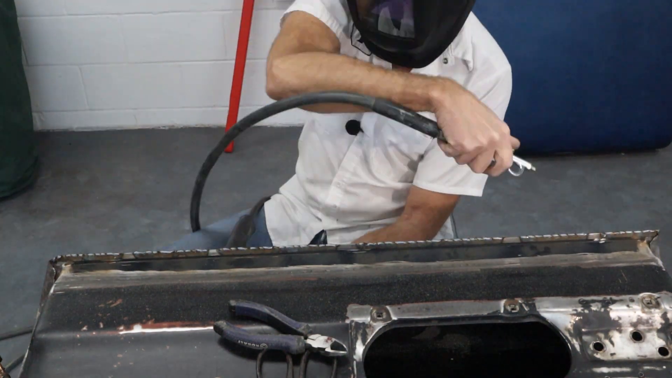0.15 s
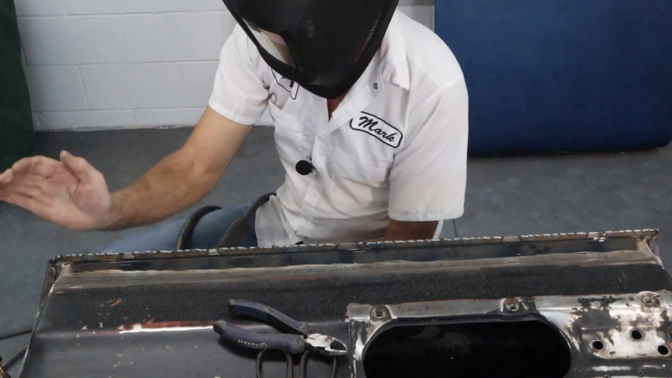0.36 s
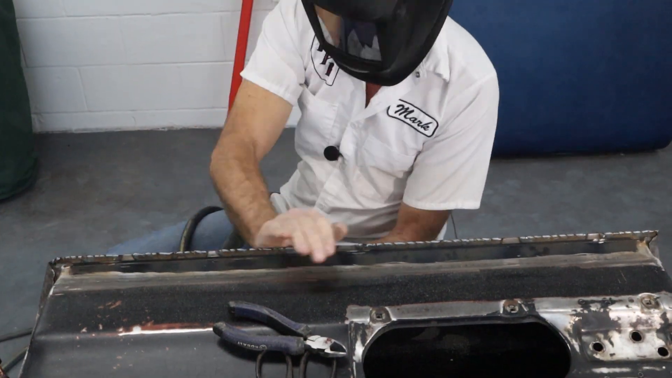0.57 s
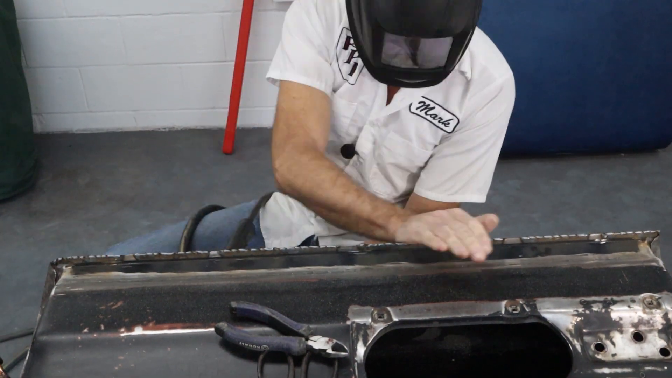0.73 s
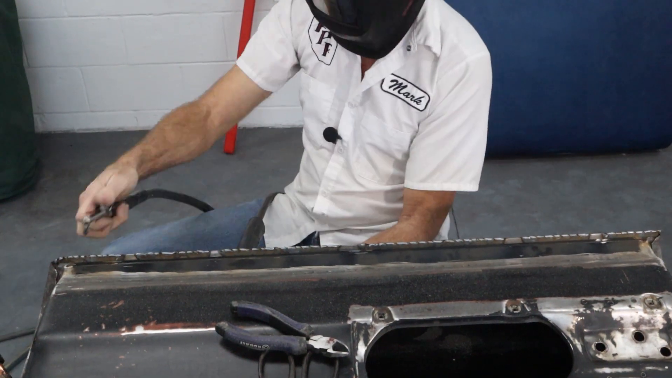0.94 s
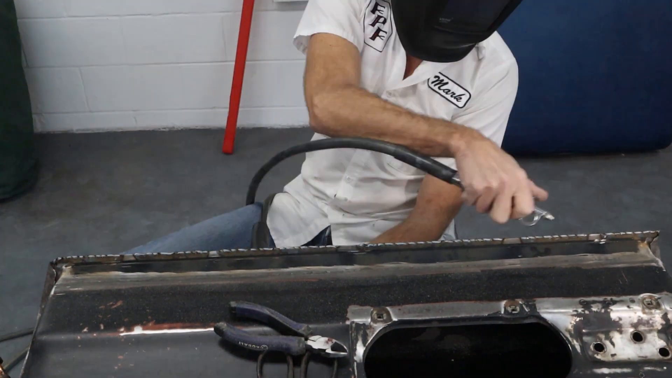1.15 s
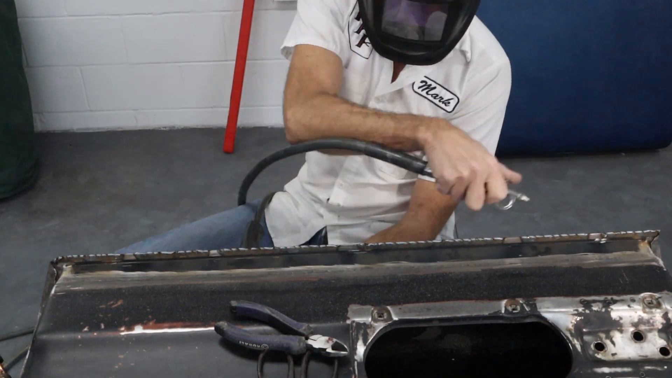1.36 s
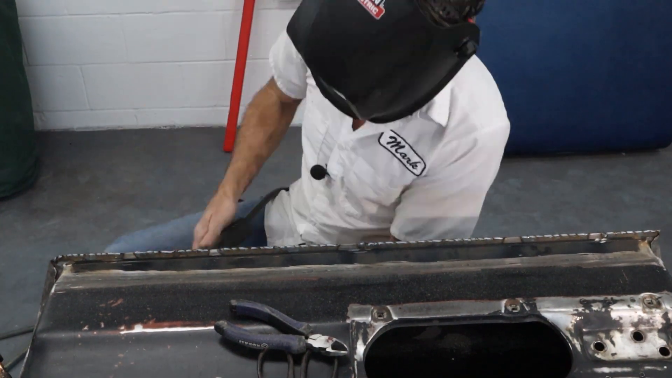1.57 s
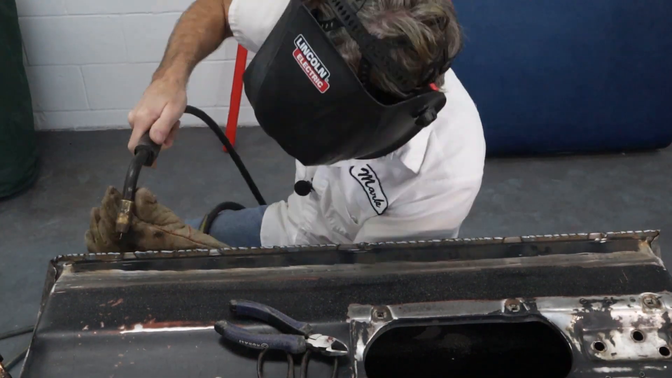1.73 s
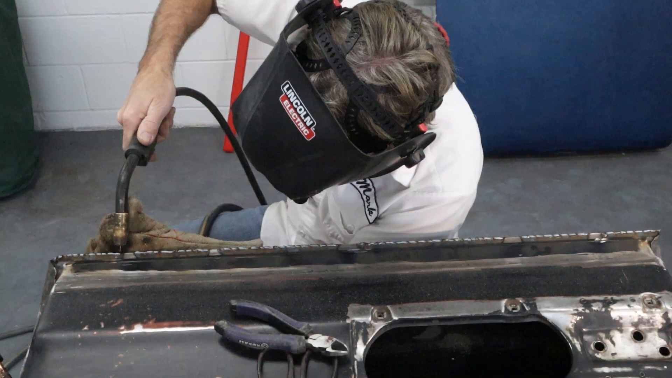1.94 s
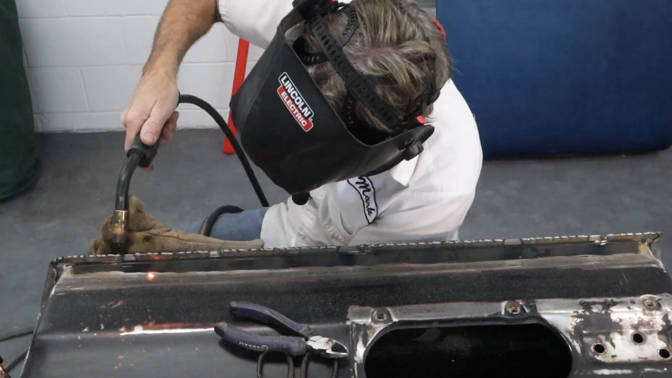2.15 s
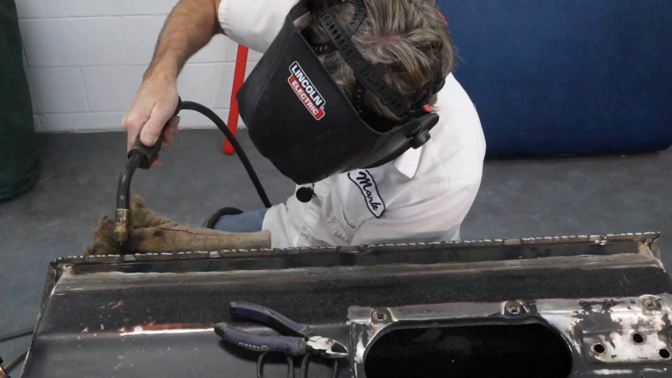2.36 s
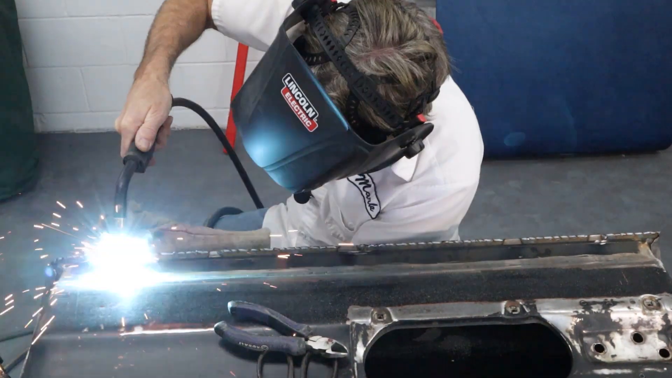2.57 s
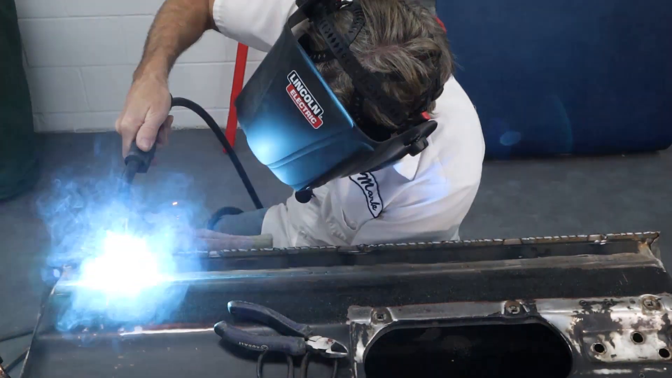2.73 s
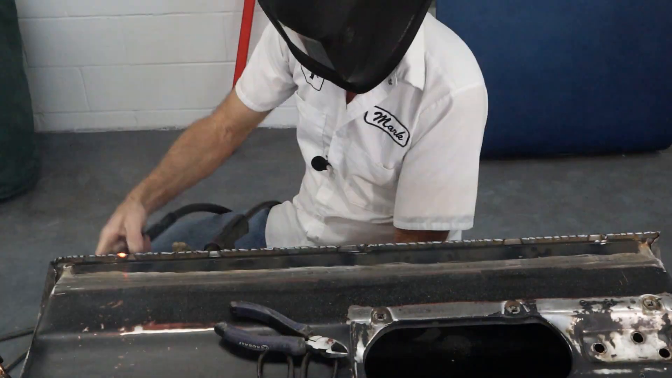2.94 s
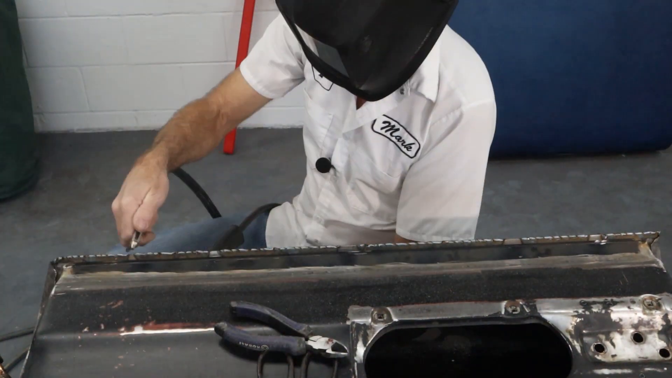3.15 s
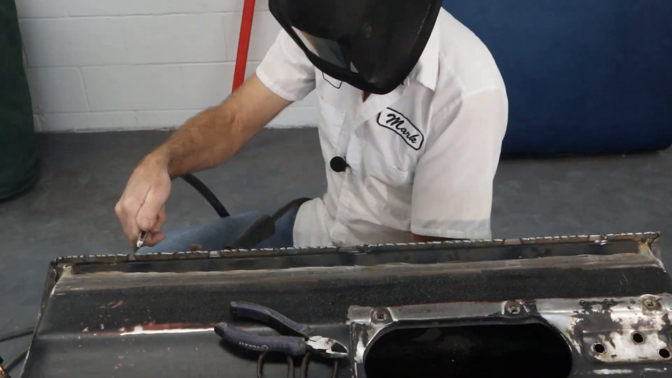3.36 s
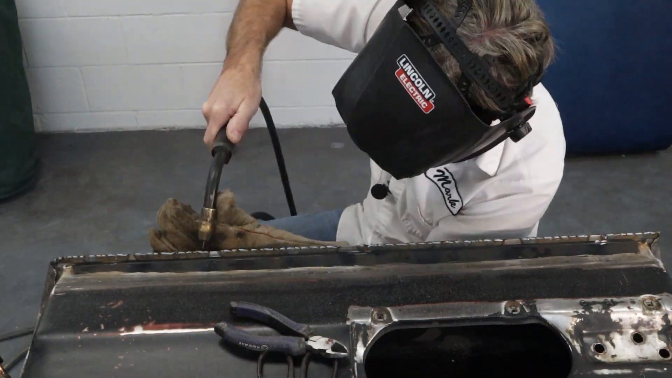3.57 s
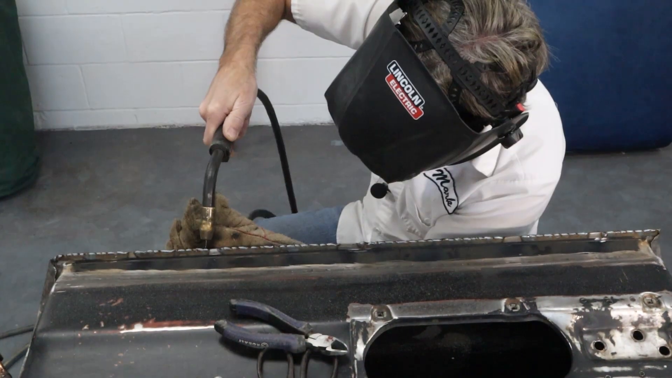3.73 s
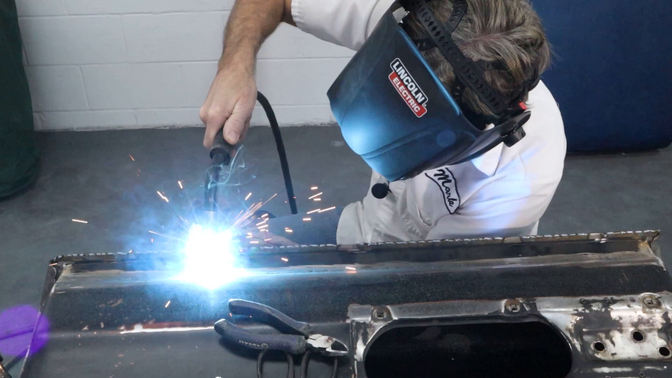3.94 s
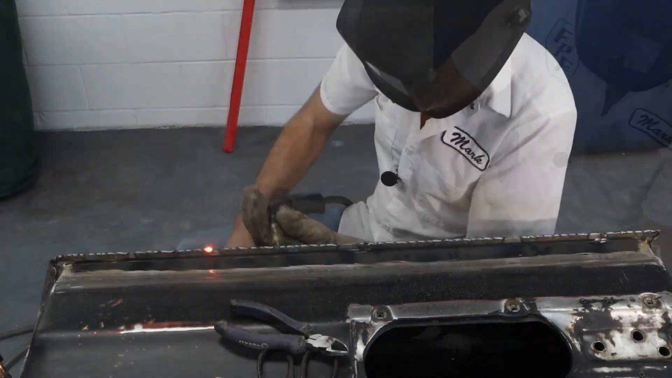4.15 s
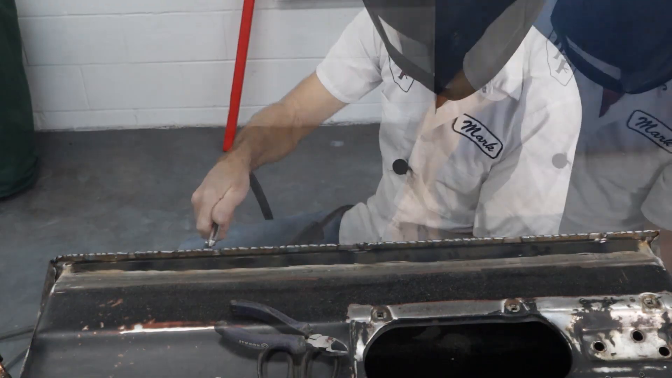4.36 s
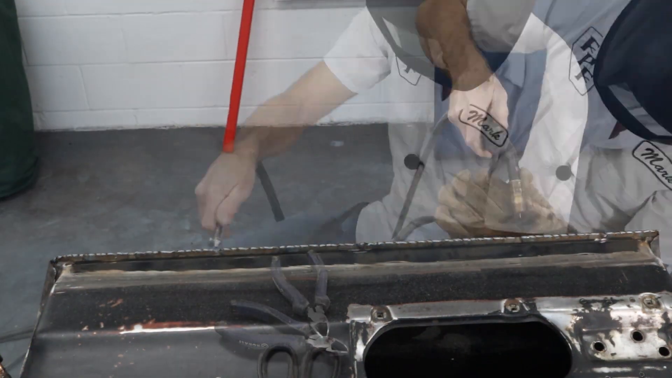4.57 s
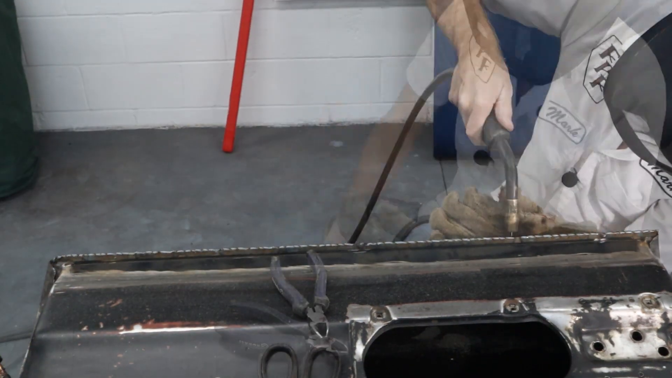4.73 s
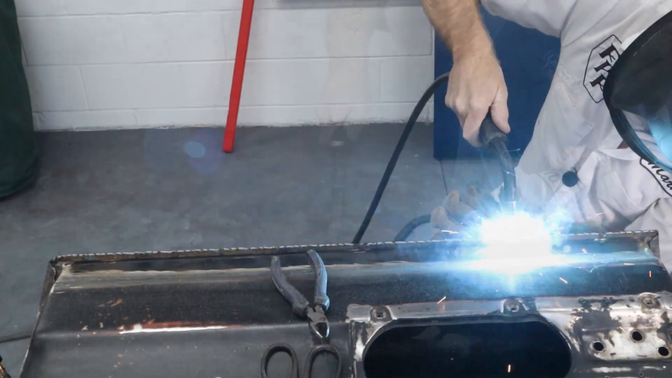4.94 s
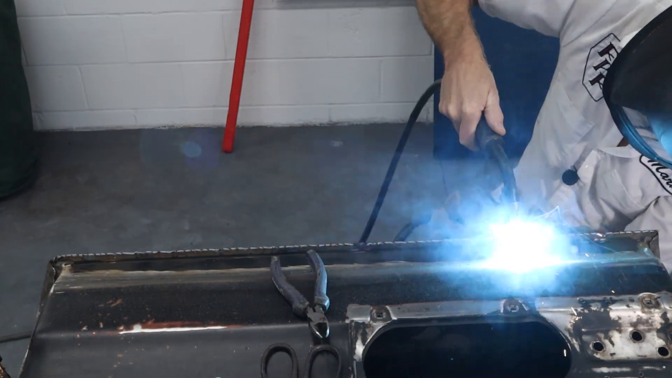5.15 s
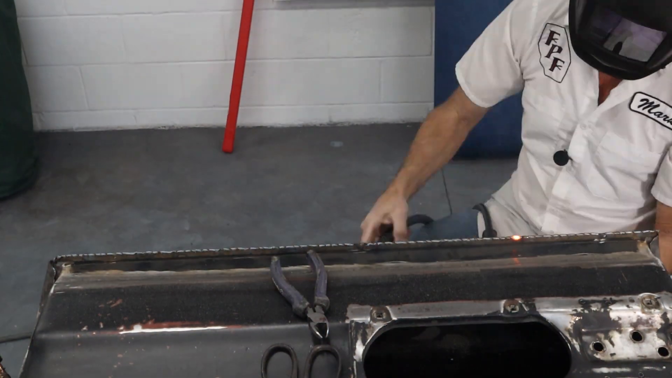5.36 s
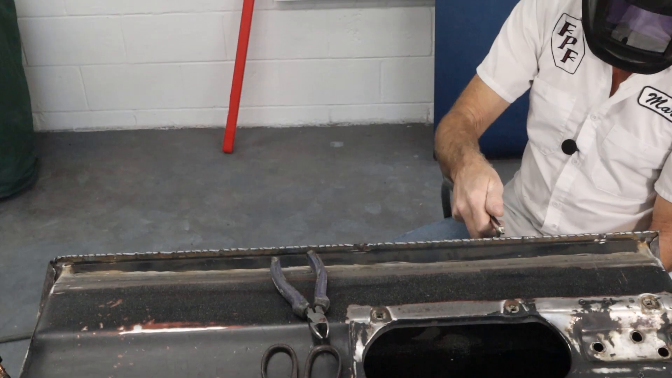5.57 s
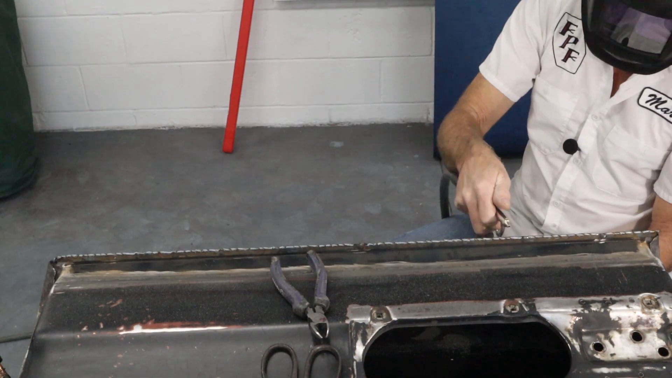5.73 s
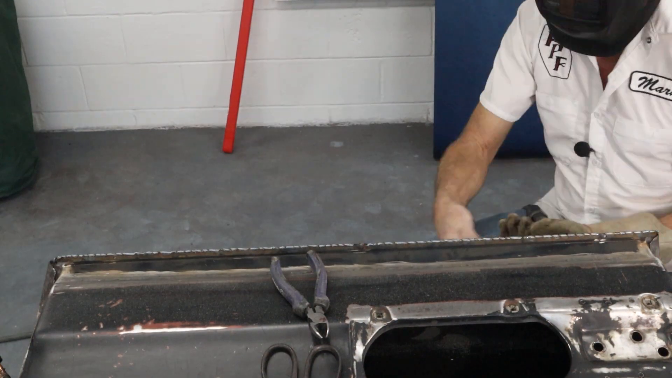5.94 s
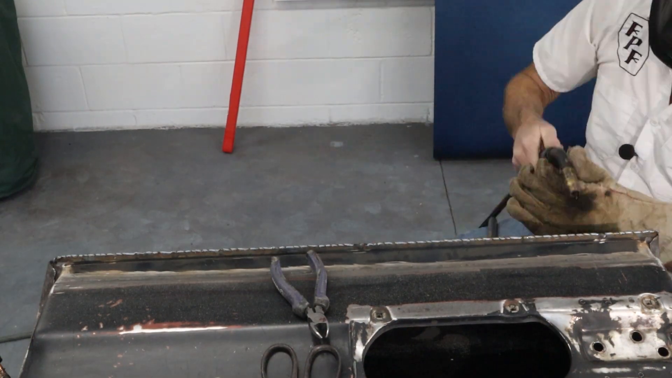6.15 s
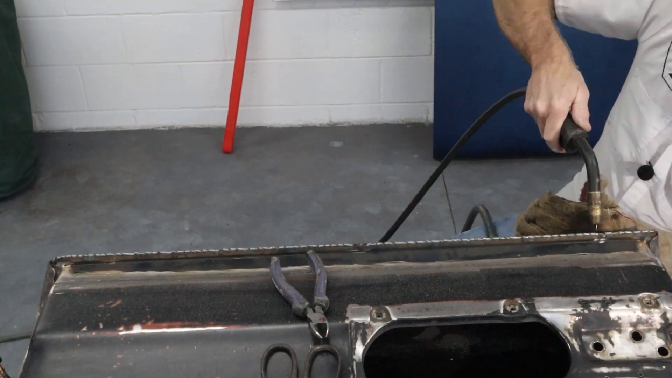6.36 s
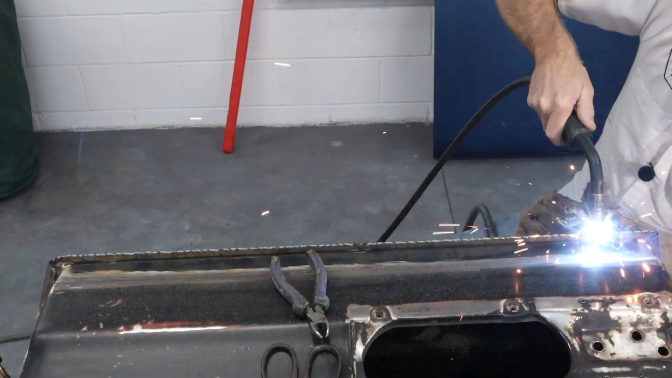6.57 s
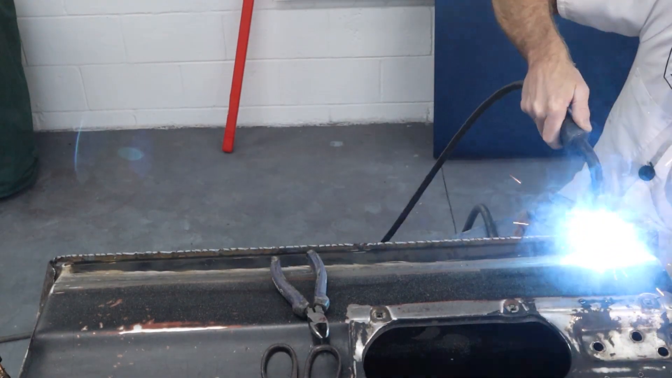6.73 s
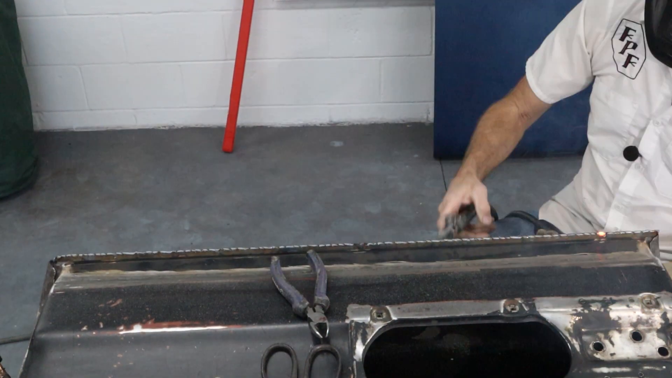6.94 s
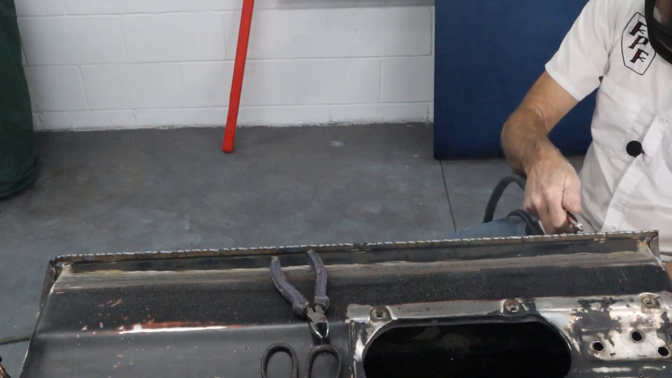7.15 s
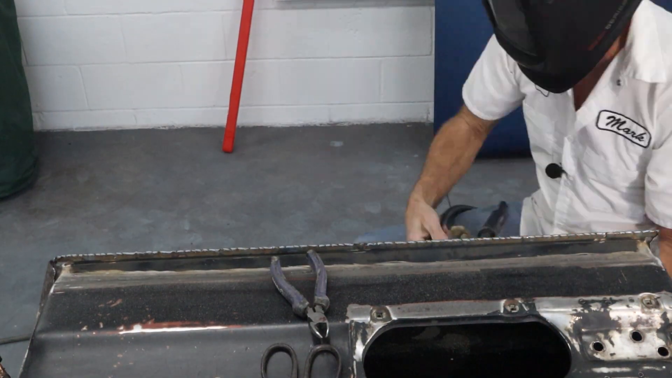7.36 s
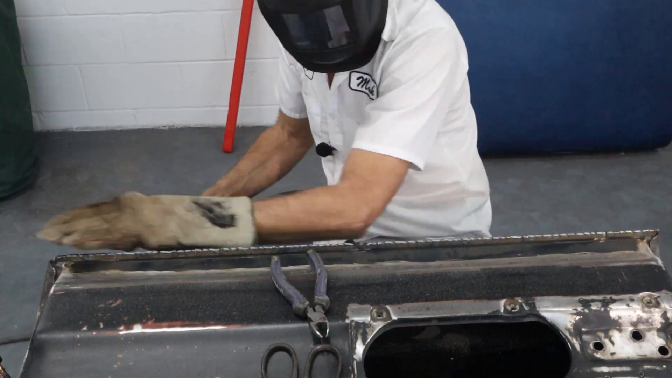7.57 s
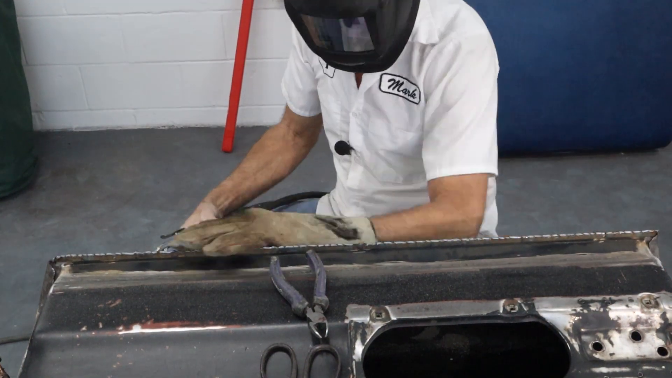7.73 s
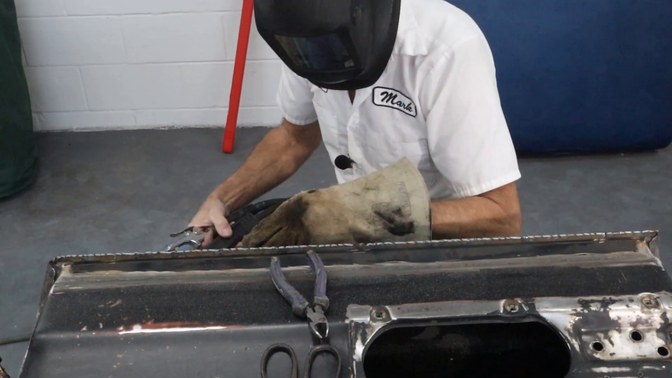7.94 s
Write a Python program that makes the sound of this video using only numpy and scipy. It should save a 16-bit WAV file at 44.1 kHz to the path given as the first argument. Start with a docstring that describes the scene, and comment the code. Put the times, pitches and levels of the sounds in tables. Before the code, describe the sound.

A welder tacks a steel panel in four brief spark bursts, cooling each with fluttering air blasts, over a thin steady electrical whine.

```python
"""A jet of air hisses first, with a thin machine whine and whir behind it; soon arc sparks crackle in short stitches.
A welder tacks a thin steel panel and cools each tack with a compressed-air nozzle, played at high speed.
Sparks are filtered clicks, air is shaped noise that swells over the seam, tools ring the sheet's resonances;
whine and whir are wavering sines and noise that sink under loud spells, heard by a small clip-on microphone."""
import sys
import numpy as np
from scipy import signal
from scipy.fft import rfft, irfft
from scipy.io import wavfile
from scipy.ndimage import uniform_filter1d

SR = 44100
rng = np.random.default_rng(int(sys.argv[2]) if len(sys.argv) > 2 else 0)


def pcm_store(signal):
    """Save signal as 16-bit PCM."""
    levels = np.round(np.clip(np.atleast_2d(signal), -1, 1) * 32767)
    wavfile.write(sys.argv[1], SR, levels.astype(np.int16).T)


def gain_from_db(level_db):
    """Turn a decibel level (scalar or array-like) into a linear amplitude factor."""
    decades = np.asarray(level_db, float) / 20
    return 10 ** decades


N = 352800

# level of the machine's whir: (time [s], level [dB])
MACHINE_LEVEL = [(0, -44.5), (2.6, -45), (2.9, -39.5), (3.05, -40), (3.5, -46.5), (4.4, -41.5),
                 (4.95, -47.5), (5.5, -46.5), (5.95, -47.5), (6.55, -44.5), (7.05, -47), (7.4, -50),
                 (7.55, -42), (8, -45)]
# main whine, shaded as the welder shifts along the bench: (time [s], level [dB])
WHINE_LEVEL = [(0, -50.5), (2.6, -48.5), (4.3, -48), (4.65, -52.5), (5.52, -59.5), (6.0, -57.5), (7.1, -62),
               (7.45, -56.5), (7.65, -48), (8, -49.5)]
# spectrum of the whir: (frequency [Hz], relative level [dB])
WHIR_COLOUR = [(20, -24), (45, -42), (80, -48), (140, -44), (220, -33), (480, -25.5), (1290, -21.5),
               (2140, -21.5), (3890, -14.5), (4760, -17), (6420, -15.5), (11700, -16), (15800, -18.5)]
# resonances of the machine's casing: (frequency [Hz], width [Hz], lift [dB])
CASING = [(1774, 450, 8.5), (3820, 560, 2.5), (3960, 39, 9.5), (6580, 310, 7), (9180, 920, 5),
          (12200, 410, 5)]
# fainter tones of the machine: (frequency [Hz], level over the whir [dB])
TONES = [(480, -36.5), (3700, -22), (3985, -20.5), (6019, -17.5), (6340, -23), (6655, -30), (6853, -26),
         (7275, -14.5), (7706, -26), (8238, -15), (9304, -30), (11789, -23)]
# each stitch: (arc takes hold [s], stops [s], settled spark level [dB], extra at the start [dB],
# settled shielding gas level [dB])
STITCHES = [(2.634, 2.896, -18, 8, -35.5), (3.926, 4.167, -16.5, 5.5, -37), (4.95, 5.308, -19, 10, -41),
            (6.637, 6.893, -18.5, 6, -41.5)]
# single sparks placed by time, most of them strong, with two stray snaps outside the stitches:
# (time [s], level [dB])
PLACED_SPARKS = [(2.1769, -7.5), (2.6239, 0.5), (2.633, 0), (2.6352, -7), (2.638, -2), (2.6416, -4),
                 (2.6452, -9), (2.659, -14), (2.6746, -6), (2.7027, -5), (2.8024, -9.5), (2.8158, -12),
                 (2.8712, -14), (2.8805, -11), (3.917, -9), (3.9182, -8.5), (3.9283, -2), (3.938, -5),
                 (3.9474, -16), (3.9583, -6), (3.9606, -8), (4.011, -3.5), (4.079, -7.5), (4.9298, -6.5),
                 (4.9427, -11), (4.947, -2.5), (4.9488, -16), (4.9538, -3.5), (4.9602, -12), (4.962, -2),
                 (4.9653, -10), (5.0102, -8), (5.07, -9.5), (6.284, -15.5), (6.6262, -14), (6.6407, -19),
                 (6.6533, -8), (6.6614, -7.5), (6.6735, -3.5), (6.7053, -5), (6.717, -5)]
# spectrum of a spark: (frequency [Hz], relative level [dB])
SPARK_COLOUR = [(120, -37), (200, -35), (610, -22.5), (1600, -14.5), (3050, -8.5), (8330, -2), (11800, -4),
                (12800, -8), (13800, -8), (15800, -14.5)]
# the air valve: (opens [s], shuts [s])
VALVE = [(0, .228), (1.0615, 1.497), (2.125, 2.19), (3.0515, 3.452), (4.3415, 4.588), (5.5445, 5.921),
         (6.028, 6.142), (7.0905, 7.376)]
# each blast of air: (hiss at first [dB], hiss at last [dB], roar minus hiss [dB])
BLASTS = [(-39, -39, -13), (-32.5, -46.5, -14), (-41, -54, -3.5), (-34.5, -40.5, -12), (-33.5, -40, -15.5),
          (-34, -43, -29), (-39, -54, -6), (-34, -42.5, -14.5)]
# the jet crosses an edge of the panel: (time [s], hiss [dB], roar minus hiss [dB], length [ms])
EDGE_SWEEPS = [(0.004, -37, 1, 6.1), (0.104, -31, -17, 5), (0.09, -34, -27, 20), (0.128, -31, -11, 3),
               (0.138, -32, -22, 4), (0.21, -30.5, -3.5, 4.1), (1.163, -33, -7, 5.7), (1.202, -26, -4, 10),
               (1.225, -24.5, -5.5, 4.2), (1.348, -31.5, -30, 5), (1.377, -28, -14.5, 8.5),
               (1.427, -31, -22, 21), (1.435, -34.5, 7, 4.7), (1.455, -34, 1.5, 9.7), (1.492, -34.5, -8, 3),
               (4.343, -27, -28, 2.8), (4.364, -35, -16, 11), (4.421, -34.5, -17, 4),
               (5.677, -34, -27, 3.2), (5.698, -38, -27, 4.3), (5.79, -34.5, -28, 7.2),
               (5.825, -32.5, -8, 5.6), (5.886, -31.5, -3.5, 9.4), (5.915, -41, -9, 2),
               (6.115, -32, -10.5, 7.9), (7.152, -35, -14, 6), (7.21, -37, -3, 16)]
# the hand wags the nozzle over the tack:
# (first pass [s], last pass [s], first hiss [dB], last hiss [dB], roar minus hiss [dB])
WAGS = [(1.096, 1.286, -28.5, -30, -12), (3.098, 3.437, -29.5, -34.5, -15), (6.06, 6.078, -39, -36.5, -19),
        (7.122, 7.33, -25.5, -35.5, -9.5)]
# spectrum of the hiss: (frequency [Hz], relative level [dB])
HISS_COLOUR = [(100, -51), (600, -30), (1460, -18.5), (2140, -17.5), (5000, -13), (8300, -6.5),
               (13400, 1.5), (15800, -4.5)]
# spectrum of the roar: (frequency [Hz], relative level [dB])
ROAR_COLOUR = [(300, -65), (1700, -38), (2300, -13.5), (2800, -4), (4200, -5.5), (6000, -7), (8000, -7.5),
               (12000, -14)]
# resonances of the blown panel: (frequency [Hz], width [Hz], lift [dB])
PANEL = [(2610, 170, 4), (3420, 60, 4.5), (4120, 170, 5.5), (4400, 130, -7), (5400, 94, 4.5)]
# torch and tools touch the sheet: (time [s], level [dB], strongest ring [Hz])
CLINKS = [(0.2773, -36.5, 4500), (0.3177, -40, 7270), (1.5489, -32.5, 5730), (1.6337, -33, 6850),
          (1.6566, -21, 6760), (1.6716, -29, 5050), (1.695, -27, 4300), (1.719, -29, 4430),
          (1.7374, -27.5, 6770), (1.7694, -31, 5500), (2.3066, -30.5, 3850), (2.9444, -31.5, 4200),
          (2.962, -20, 7100), (2.976, -19, 7100), (2.987, -25, 7020), (3.0004, -27, 4200),
          (6.0082, -32, 3930), (7.4465, -25, 6860), (7.502, -34, 7240), (7.536, -23.5, 4300),
          (7.5433, -32, 4290), (7.553, -27, 7300), (7.584, -25, 4130), (7.5994, -40, 4290)]
# ringing modes of the sheet: (frequency [Hz], width [Hz], level [dB])
SHEET_MODES = [(4290, 150, -2.5), (5100, 200, -3), (5140, 3600, -4), (6460, 300, -17), (6680, 180, -10.5),
               (7120, 60, -4.5), (11030, 480, -6)]
# pops as the arc strikes or the valve opens: (time [s], level [dB])
POPS = [(1.062, -28.5), (2.6238, -29), (3.052, -34), (3.918, -54), (4.342, -35), (4.9298, -31),
        (5.545, -28), (6.6261, -14.5), (7.091, -29.5)]
# the shirt brushes the microphone: (time [s], level [dB], length [ms])
RUSTLES = [(.39, -57, 8.8), (.62, -64, 14), (0.859, -53.5, 10.6), (1.288, -61, 8.3), (1.71, -56.5, 35),
           (2.28, -59.5, 18), (2.97, -58, 20), (4.229, -52, 16.5), (5.377, -59, 7.2), (6.25, -67.5, 96),
           (6.963, -57.5, 9), (7.62, -61.5, 65), (7.85, -61, 19)]
# spectrum of brushed cloth: (frequency [Hz], relative level [dB])
CLOTH_COLOUR = [(60, -32), (200, -8), (400, 1), (1100, -0.5), (1600, -3.5), (3000, -57)]
# small knocks near the microphone: (time [s], peak [dB], pitch [Hz])
KNOCKS = [(0.195, -43, 870), (0.806, -29, 1050), (.86, -47, 700), (0.973, -45, 900), (1.563, -50, 704),
          (1.59, -50, 604), (1.642, -40.5, 800), (3.405, -42.5, 600), (4.517, -30.5, 1920),
          (5.21, -43, 704), (5.341, -43.5, 690), (5.378, -51, 795), (5.937, -57, 352), (5.983, -44, 1000),
          (6.094, -45.5, 600), (6.139, -45, 650), (6.185, -55, 400), (6.271, -34, 1300), (6.41, -47, 900),
          (7.458, -43, 890)]
# the sound drops out: (from [s], to [s])
DROPOUTS = [(7.8865, 7.900), (7.928, 7.9505)]
# ticks in the dropouts: (time [s], level [dB])
DROPOUT_TICKS = [(7.8988, -42), (7.938, -28), (7.9398, -28), (7.943, -29), (7.9462, -23)]

TOP_HZ = 15800
POP_S = 0.0001
# air nozzle
OPENS_S, SHUTS_S = 0.0005, 0.012
OPENING_DB, OPENING_S = 3.5, 0.0045  # the first rush as the valve opens
GUST_DB = 1
WAG_HZ, WAG_MS, WAG_SCATTER_DB = 33, 5.5, 1
RISE_SHARE = 0.5  # rise of a swell as a share of its length
# arc
SNAP_GAP_S, SNAP_TOP_HZ = 0.0016, 12600
SPUTTER_DB, FIZZ_DB = 1.2, -13
SETTLE_S, GAS_LEAD_S = 0.076, 0.014


def time():
    """Seconds of every sample."""
    return np.arange(N) / SR


def unit(x):
    """Scale to rms 1."""
    return x / np.sqrt(np.mean(x ** 2))


def colour(x, points, peaks=()):
    """Shape a spectrum by (Hz, dB) points and lift (Hz, width, dB) resonances."""
    hz = np.arange(N // 2 + 1) * SR / N + 1
    point_hz, point_db = np.array(points).T
    db = np.interp(np.log(hz), np.log(point_hz), point_db)
    for centre_hz, width_hz, lift_db in peaks:
        db = db + lift_db / (1 + (2 * (hz - centre_hz) / width_hz) ** 2)
    return irfft(rfft(x) * gain_from_db(db), N)


def ring(x, hz, width_hz):
    """One resonance, gain 1 at its centre."""
    return signal.lfilter(*signal.iirpeak(hz, hz / width_hz, SR), x)


def walk(rate):
    """Random levels held 1 / rate s and smoothed twice; spread near 1."""
    k = int(SR / rate)
    held = np.repeat(rng.standard_normal(N // k + 1), k)
    return 1.345 * uniform_filter1d(uniform_filter1d(held, k), k)[:N]


def swell(s, rise_s, fall_s):
    """Sample range and shape of one swell: a bell with its own rise and a fall that trails off."""
    first = max(int((s - 4 * rise_s) * SR), 0)
    last = min(int((s + 8 * fall_s) * SR), N)
    i = np.arange(first, last)
    late = i / SR - s
    widths = np.abs(late) / np.where(late < 0, rise_s, fall_s)
    trail = 1 + 0.37 * np.maximum(late / fall_s, 0)
    return i, np.exp(-0.5 * widths ** 2 / trail)


def impulses(rows):
    """One impulse for each (s, dB) row."""
    s, db = np.transpose(rows)
    out = np.zeros(N)
    np.add.at(out, np.round(s * SR).astype(int), gain_from_db(db))
    return out


def fade(x, seconds):
    """Leaky average that forgets in the given time."""
    keep = np.exp(-1 / (seconds * SR))
    return signal.lfilter([1 - keep], [1, -keep], x)


def spell(start_s, stop_s, db, rise_s, fall_s):
    """Gain at the given dB between two moments, closing quickly outside."""
    t = time()
    opening = (t - start_s) / rise_s
    closing = (stop_s - t) / fall_s
    return gain_from_db(db) * np.clip(np.minimum(opening, closing) + 1, 0, 1)


def settling(start_s, seconds):
    """One until the start, then dying away in the given time."""
    return np.exp(-np.maximum(time() - start_s, 0) / seconds)


def tone(hz, drift, waver_db):
    """A sine whose pitch drifts by a share and whose level wavers."""
    phase = 2 * np.pi * np.cumsum(hz * (1 + drift)) / SR
    return gain_from_db(waver_db) * np.sqrt(2) * np.sin(phase)


def machine():
    """Faint tones that share the fan's speed and come and go, over a whir that rings the casing."""
    speed = 0.000497 * walk(20)
    tones = sum(gain_from_db(db) * tone(hz, speed, 1.3 * walk(17)) for hz, db in TONES)
    whir = unit(colour(rng.standard_normal(N), WHIR_COLOUR, CASING)) * gain_from_db(0.89 * walk(10))
    return gain_from_db(np.interp(time(), *np.transpose(MACHINE_LEVEL))) * (tones + whir)


def whine():
    """The strongest tone of the machine, with a slightly drifting pitch."""
    level = gain_from_db(np.interp(time(), *np.transpose(WHINE_LEVEL)))
    return level * tone(1712.0, 0.0014 * walk(20), 1.16 * walk(60))


def ducking(loud, rise_s, recover_s, knee_db, slope):
    """Gain that sinks while a loud sound plays and climbs back after it."""
    power = fade(fade(loud ** 2, rise_s), recover_s)
    return (1 + power / gain_from_db(knee_db) ** 2) ** -slope


def knocks():
    """Each knock is one heavily damped swing or two."""
    out = 0
    for s, db, hz in KNOCKS:
        knock = ring(ring(impulses([(s, 0)]), hz, 0.9 * hz), hz, 0.9 * hz)
        out = out + gain_from_db(db) * knock / np.abs(knock).max()
    return out


def bumps():
    """One-sided pressure pops, damped knocks and dull scuffs of cloth."""
    pops = fade(impulses(POPS), POP_S) * POP_S * SR
    scuff = np.zeros(N)
    for s, db, length_ms in RUSTLES:
        i, bell = swell(s, length_ms / 1500, length_ms / 1000)
        scuff[i] += gain_from_db(db) * bell
    cloth = unit(colour(rng.standard_normal(N), CLOTH_COLOUR)) * gain_from_db(3.5 * walk(150))
    return pops + knocks() + scuff * cloth


def clinks():
    """A short rattling contact rings the sheet, most in the mode nearest to its own pitch."""
    out = 0
    for hz, width_hz, mode_db in SHEET_MODES:
        push = np.zeros(N)
        for s, db, own_hz in CLINKS:
            i, bell = swell(s + 0.0014, 0.0014, 0.0087)
            mismatch_db = min(70.0 * abs(np.log(own_hz / hz)), 12.0)
            push[i] += gain_from_db(db - mismatch_db) * bell
        rattle = push * rng.standard_normal(N)
        # a narrow mode passes less noise, so make up for its width
        out = out + gain_from_db(mode_db) * ring(rattle, hz, width_hz) * np.sqrt(SR / width_hz)
    return gain_from_db(-13.5) * out


def gas():
    """Thin hiss of shielding gas, flowing just before the arc takes hold and strongest then."""
    flow = 0
    for start_s, stop_s, *_, db in STITCHES:
        level_db = db + 4 * settling(start_s, 0.11)
        flow = flow + spell(start_s - GAS_LEAD_S, stop_s, level_db, 0.0069, 0.015)
    return flow * unit(colour(rng.standard_normal(N), HISS_COLOUR))


def passes():
    """Rows like EDGE_SWEEPS for the even to and fro of the hand."""
    rows = []
    for first_s, last_s, first_db, last_db, roar_db in WAGS:
        along = np.linspace(0, 1, round((last_s - first_s) * WAG_HZ) + 1)
        scatter_db = WAG_SCATTER_DB * rng.standard_normal(len(along))
        s = first_s + (last_s - first_s) * along
        db = first_db + (last_db - first_db) * along + scatter_db
        rows += [(moment, level, roar_db, WAG_MS) for moment, level in zip(s, db)]
    return rows


def jet():
    """Turbulent hiss of the open nozzle; crossing an edge adds hiss and a lower roar, both gritty."""
    hiss_power, roar_power = np.zeros(N), np.zeros(N)
    gusts_db = GUST_DB * walk(35)
    for (opens, shuts), (first_db, last_db, roar_db) in zip(VALVE, BLASTS):
        steady_db = np.interp(time(), [opens, shuts], [first_db, last_db])
        rush_db = OPENING_DB * settling(opens, OPENING_S)
        flow = spell(opens, shuts, steady_db + rush_db + gusts_db, OPENS_S, SHUTS_S) ** 2
        hiss_power += flow
        roar_power += gain_from_db(roar_db) ** 2 * flow
    for s, db, roar_db, length_ms in EDGE_SWEEPS + passes():
        i, bell = swell(s, RISE_SHARE * length_ms / 1000, length_ms / 1000)
        hiss_power[i] += gain_from_db(db) ** 2 * bell
        roar_power[i] += gain_from_db(db + roar_db) ** 2 * bell
    valve = sum(spell(opens, shuts, 0, OPENS_S, SHUTS_S) for opens, shuts in VALVE)
    # grit: about 300 samples a second are stronger
    grit = 1 + (rng.random(N) < 300 / SR) * 1.5
    hiss = unit(colour(rng.standard_normal(N) * grit, HISS_COLOUR)) * gain_from_db(1.9 * walk(250))
    roar = unit(colour(rng.standard_normal(N) * grit, ROAR_COLOUR, PANEL)) * gain_from_db(1.7 * walk(150))
    return valve * (hiss * np.sqrt(hiss_power) + roar * np.sqrt(roar_power))


def stitches():
    """Level of the random snaps: each stitch starts with a surge that settles."""
    level = 0
    for start_s, stop_s, db, surge_db, _ in STITCHES:
        level_db = db + surge_db * settling(start_s, SETTLE_S)
        level = level + spell(start_s, stop_s, level_db, 0.0017, 0.002)
    return level


def arc():
    """Short circuits snap about 570 times a second; each comes back off the bench and leaves a brief fizz."""
    chance = rng.standard_normal((6000, 2))
    s = np.cumsum(SNAP_GAP_S * np.exp(0.42 * chance[:, 0]))
    s = s[s < N / SR - 0.01]
    placed_s = np.array(PLACED_SPARKS)[:, 0]
    # no random snap lies just beside a placed spark
    free = np.abs(s[:, None] - placed_s).min(axis=1) > 0.0008
    snap_rows = np.c_[s, 2.8 * chance[:len(s), 1]][free]
    random_snaps = impulses(snap_rows) * stitches() * gain_from_db(SPUTTER_DB * walk(60))
    # scale by the peak that a single click has after colouring
    click_peak = colour(impulses([(0.000011, 0)]), SPARK_COLOUR)[0]
    snaps = colour(random_snaps + impulses(PLACED_SPARKS), SPARK_COLOUR) / click_peak
    # the snap overshoots more after than before; the bench answers a millisecond later
    overshoot = 0.07 * np.roll(snaps, 2)
    bench = gain_from_db(-21) * np.roll(snaps, int(0.00095 * SR))
    snaps = snaps - overshoot + bench
    snaps = signal.sosfilt(signal.butter(4, SNAP_TOP_HZ, fs=SR, output="sos"), snaps)
    fizz = np.sqrt(fade(snaps ** 2, 0.005)) * unit(colour(rng.standard_normal(N), SPARK_COLOUR))
    return snaps + gain_from_db(FIZZ_DB) * fizz


def scene():
    """All sources at the microphone on the shirt; whir and whine yield to the louder work."""
    sparks, air = arc(), jet()
    work = sparks + gas() + air + clinks()
    whir = machine() * ducking(work, 0.026, 0.047, -37, 0.4)
    main_tone = whine() * ducking(air + gain_from_db(-8) * sparks, 0.0016, 0.055, -44.5, 0.42)
    return (whir + main_tone + work + bumps())[None]


def band_limit(x):
    """A steep low-pass at the top of the band."""
    return signal.sosfilt(signal.butter(12, 17000, fs=SR, output="sos"), x)


def record(dry):
    """Two brief dropouts with ticks, then the top is cut."""
    t = time()
    mute = sum(np.clip(np.minimum(t - a, b - t) / 0.0004, 0, 1) for a, b in DROPOUTS)
    # each tick is an up-down pair of samples
    ticks = np.diff(impulses(DROPOUT_TICKS), prepend=0)
    heard = dry * (1 - mute * (1 - gain_from_db(-28))) + ticks
    cut = signal.ellip(10, 0.2, 70, TOP_HZ, fs=SR, output="sos")
    return band_limit(signal.sosfilt(cut, heard))


dry = scene()
out = record(dry)
pcm_store(out)
```